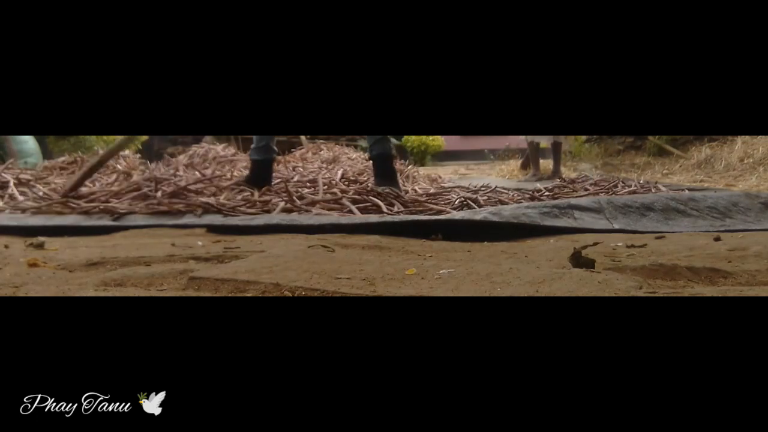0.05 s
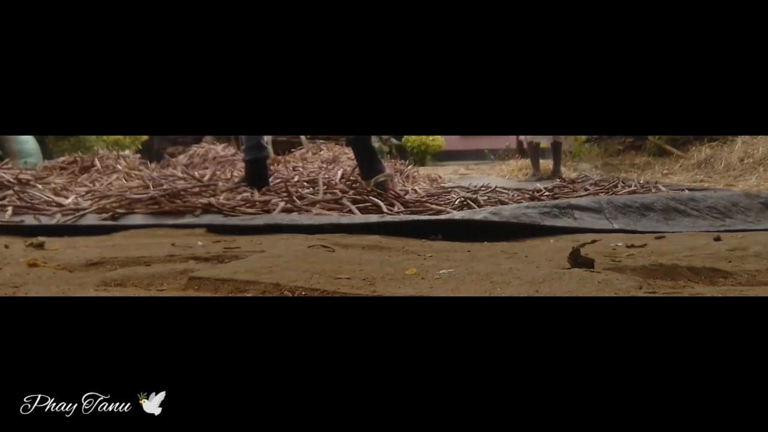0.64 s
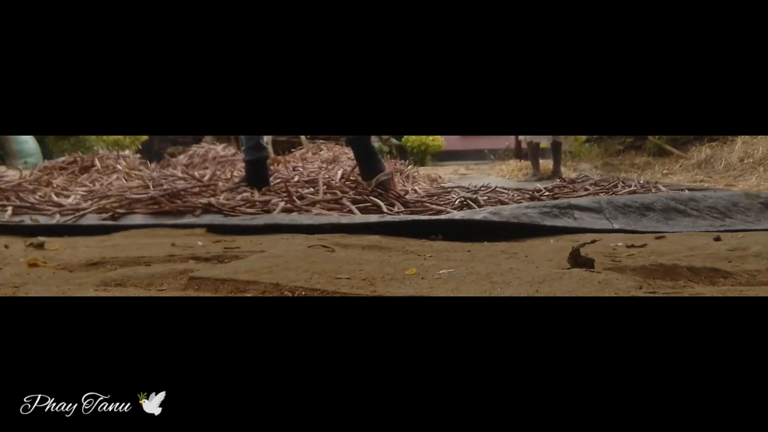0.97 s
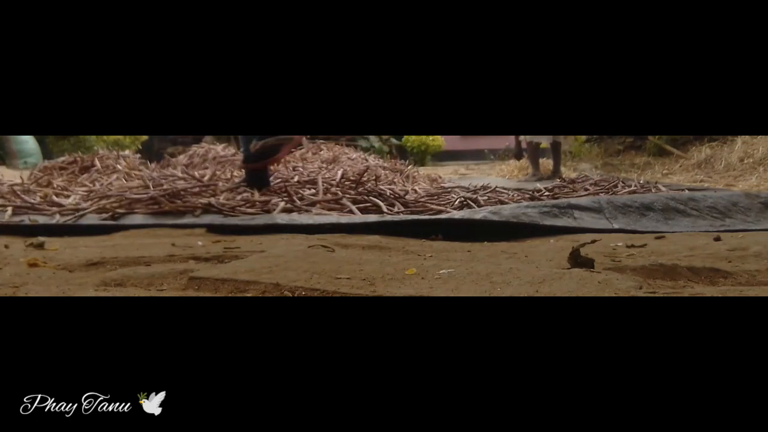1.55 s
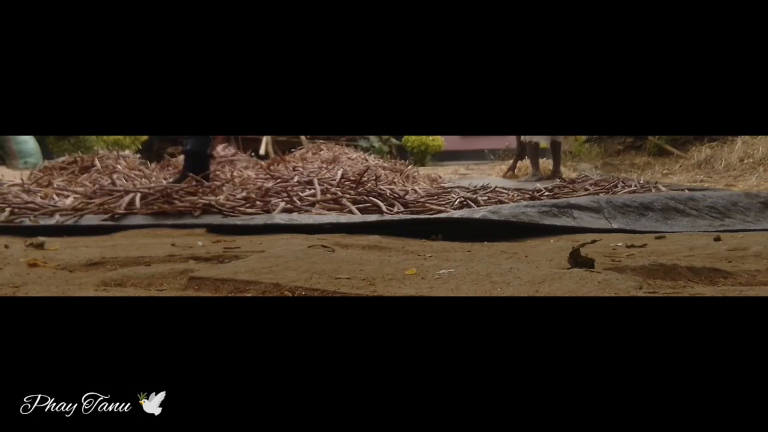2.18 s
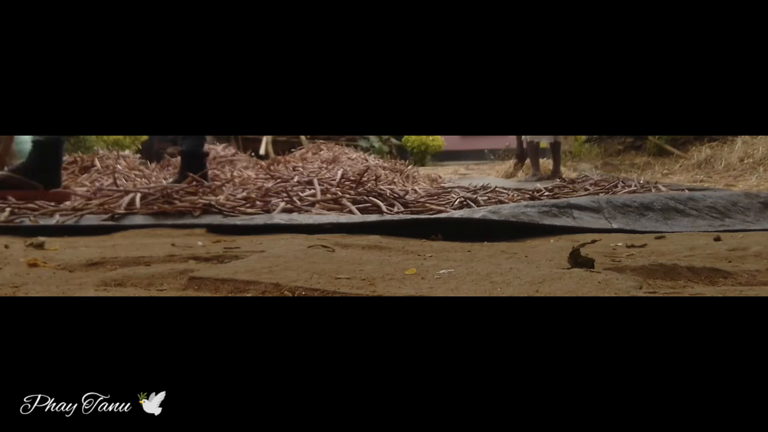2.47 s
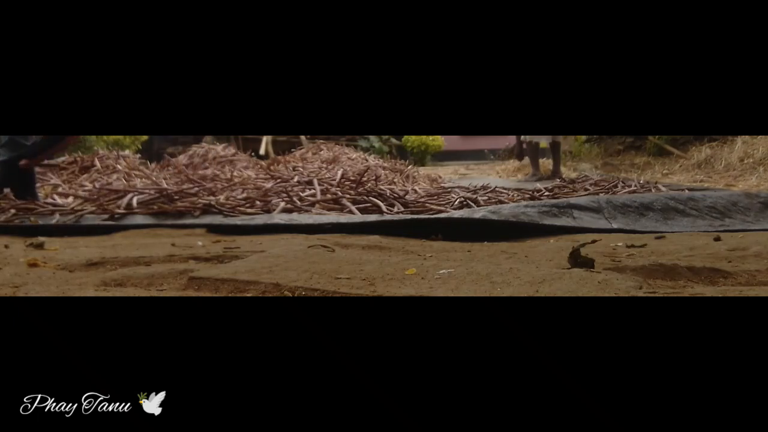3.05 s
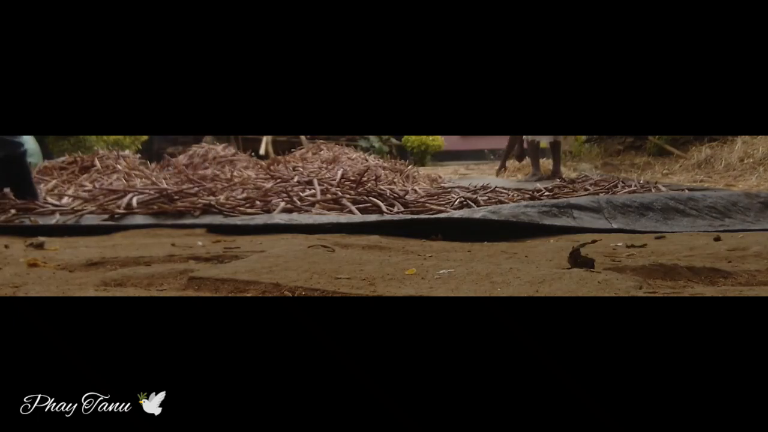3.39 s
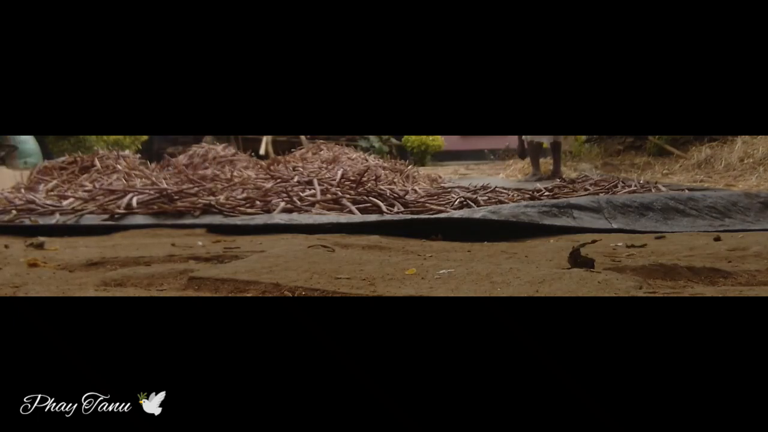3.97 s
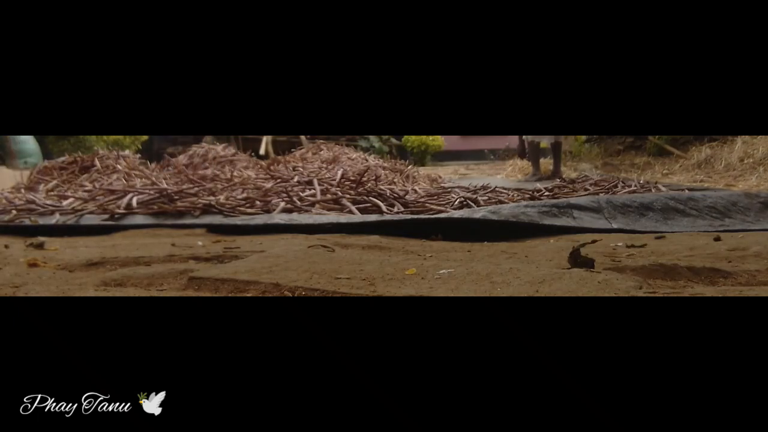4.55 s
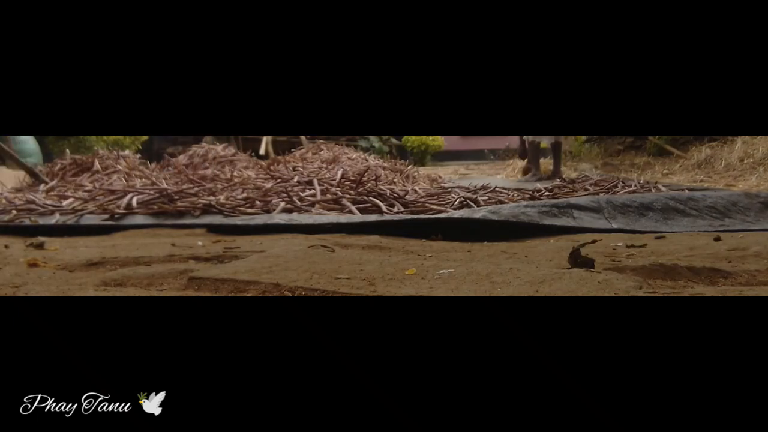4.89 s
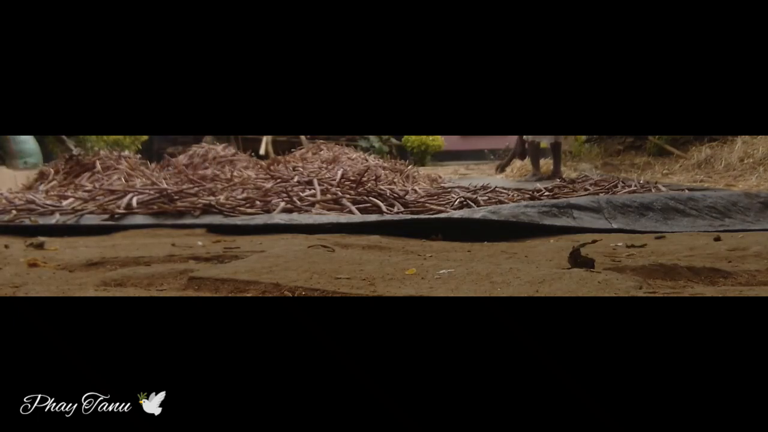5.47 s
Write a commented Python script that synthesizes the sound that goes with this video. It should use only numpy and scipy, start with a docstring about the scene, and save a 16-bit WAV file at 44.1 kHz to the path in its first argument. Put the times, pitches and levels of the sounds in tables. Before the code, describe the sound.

Dry bean pods on a tarp crackle and crunch as people tread and rake through them, heard from one spot in a still yard. Each push is a shower of tiny, crisp cracks with a low crunch, a faint rake rattle and a light husk scrape, while single pods snap out sharply.

Bursts start at once and run to about 0.6 seconds, then resume from 0.85 to 2.2, with a cluster of loud snaps around 1.8 to 2. After a short lull, a strong crunch comes from 2.6 to 3, with a pod caving in at 2.7. Softer rustling follows from 3.3 to 4, and a brief crack at 4.2. Faint ticks and rattles lead to a short burst at 4.9, a weak low crunch at 5.3 and a last push near 5.7. Each burst dulls as it fades into very faint outdoor air.

```python
"""Treading dry bean pods

People tread and rake through a heap of pods on a tarp in a quiet yard, heard at one microphone.
Each push sets off a shower of tiny fractures that ring the thin shells and the rake; a foot's
weight adds a low crunch, and single pods snap out above the rest. A steep treble cut-off, like a
noise suppressor's, opens as the crackle gets louder and closes as it fades."""
import sys
import numpy as np
from scipy import signal
from scipy.fft import rfft, irfft
from scipy.io import wavfile
from scipy.ndimage import uniform_filter1d

SR = 44100
rng = np.random.default_rng(int(sys.argv[2]) if len(sys.argv) > 2 else 0)


def put_to_file(sound):
    """Save the sound as 16-bit audio at rate SR, in the file named by the first command-line argument."""
    columns = np.atleast_2d(sound).T  # one column per channel
    safe = np.clip(columns, -1, 1)
    whole_steps = np.round(safe * 32767)
    wavfile.write(sys.argv[1], SR, whole_steps.astype(np.int16))


N = 252693
TIME = np.arange(N) / SR


def undb(db):
    """Decibels to gain."""
    return 10 ** (np.asarray(db) / 20)


def unit(x):
    """Scale to rms 1."""
    return x / np.sqrt(np.mean(x ** 2))


def response(colour, size=4096):
    """Minimum-phase impulse response of unit energy with a (Hz, dB) colour."""
    hz, db = np.transpose(colour)
    grid_hz = np.maximum(np.fft.rfftfreq(size, 1 / SR), 1)
    gain = undb(np.interp(np.log(grid_hz), np.log(hz), db))
    cepstrum = irfft(np.log(gain))
    cepstrum[1:size // 2] *= 2
    cepstrum[size // 2 + 1:] = 0
    impulse = irfft(np.exp(rfft(cepstrum)))
    return impulse / np.linalg.norm(impulse)


def ring(x, impulse):
    """Play x through an impulse response."""
    return signal.fftconvolve(x, impulse)[:len(x)]


def add(out, start_s, x):
    """Mix x into out at start_s."""
    i = int(np.clip(start_s * SR, 0, N - 1))
    out[i:i + len(x)] += x[:N - i]


def wander(rate):
    """Glide between random levels, rate a second, at rms 1."""
    step = int(SR / rate)
    levels = np.repeat(rng.standard_normal(N // step + 1), step)
    return unit(uniform_filter1d(levels, step)[:N])


# The still yard around the microphone. Each row: frequency in Hz, level in dB.
AIR_COLOUR = [(20, -23), (44, -1), (60, -15), (85, -11.5), (100, -5), (125, -12), (170, -14.5), (400, -1.5),
              (1000, -20), (2200, -24), (4400, -12.5), (6500, -22.5), (9000, -29), (15500, -24)]


def yard_air(level_db=-83):
    """Faint, even outdoor air."""
    return undb(level_db) * unit(ring(rng.standard_normal(N), response(AIR_COLOUR)))


# Foot or rake going into the heap. Each row: time of full force in seconds, hold in seconds,
# crackle level in dB, its sag while held in dB per second, rattle and crunch in relative dB.
PUSHES = [(-0.006, 0.026, -32.5, 31.5, -12.5, -19.5), (0.069, 0.031, -30.5, 21.5, -17, -21.5),
          (0.145, 0.2, -27.5, 21, -15.5, -23.5), (0.408, 0.2, -34.5, 70.5, -18.0, -22.0),
          (0.71, 0.026, -54.5, 17.5, -16.5, -28.0), (0.868, 0.078, -31, 24, -15.5, -33.5),
          (0.996, 0.13, -30.0, 2, -14, -35), (1.154, 0.29, -35.5, 22, -13.5, -23.5),
          (1.341, 0.023, -42, 23, -8.5, -20), (1.538, 0.01, -29.5, 21.0, -17.5, -39),
          (1.66, 0.084, -32, -3, -14.5, -34.5), (1.776, 0.092, -26.5, 28, -16.5, -23.5),
          (1.927, 0.22, -32, 43.5, -16, -18.5), (2.208, 0.14, -49.5, 6.0, -19.0, -31.0),
          (2.432, 0.092, -57.5, 6, -20, -18.5), (2.611, 0.14, -32, 25.5, -13.5, -35.5),
          (2.717, 0.3, -29.5, 41.5, -12.5, -22.5), (3.117, 0.16, -59.0, 1, -5.5, -21.0),
          (3.354, 0.02, -35.0, 17.5, -10.5, -27.0), (3.41, 0.19, -38, -2, -12.5, -24.5),
          (3.653, 0.34, -39.0, 13, -16.0, -38.0), (4.195, 0.19, -53, 43.5, -15.5, -24),
          (4.536, 0.11, -79, 4, -11, -16.0), (4.753, 0.064, -75, 20.0, -7.5, -12.0),
          (4.907, 0.027, -39.5, 44.5, -7, -25.0), (5.033, 0.087, -48.0, 38.5, -11.0, -26),
          (5.302, 0.21, -62.5, 15.5, -13, -9), (5.613, 0.059, -61, 1, -9.0, -14),
          (5.713, 0.05, -38.5, 19.5, -16.0, -20.5)]


def pushes(attack_s=0.087, attack_power=2.14, release_db_per_s=163):
    """Each push sinks in, sags while held and lets go; returns dB curves of crackle, rattle, crunch."""
    crackle = rattle = crunch = 1e-12
    for full_s, hold_s, db, sag, rattle_db, crunch_db in PUSHES:
        sunk = np.clip(1 - (full_s - TIME) / attack_s, 1e-6, 1)
        held_s = np.clip(TIME - full_s, 0, hold_s)
        released_s = np.maximum(TIME - full_s - hold_s, 0)
        force_db = 20 * attack_power * np.log10(sunk) - sag * held_s - release_db_per_s * released_s
        crackle += undb(db + force_db) ** 2
        rattle += undb(db + rattle_db + .88 * force_db) ** 2  # fades more slowly than the crackle
        crunch += undb(db + crunch_db + 1.2 * force_db) ** 2  # fades faster
    return 10 * np.log10([crackle, rattle, crunch])


def fractures(rate, spread_db):
    """Random clicks, rate a second, many small and a few large, of even mean power."""
    chance = np.clip(rate / SR, 1e-4, 1)
    sizes = unit(undb(spread_db * np.minimum(rng.standard_normal(N), 2.1)))
    return (rng.random(N) < chance) * rng.choice([-1, 1], N) * sizes / np.sqrt(chance)


# A thin shell cracking. Each row: frequency in Hz, level in dB.
SHELL_COLOUR = [(300, -85.5), (900, -37.5), (1900, -19.5), (2350, -10.5), (3150, -7), (3550, -7), (4200, 0),
                (4600, 1.5), (5200, -6.5), (5900, -14.5), (6800, -21.5), (7600, -43), (12000, -76.5)]


def cracking_shells(rate, size_range=0.015, count=5):
    """Shells of several sizes crack, each at its own pitch; returns their sound and the bare clicks."""
    trains = [fractures(rate / count, spread_db=3.5) / np.sqrt(count) for _ in range(count)]
    scales = 1 + size_range * np.linspace(-1, 1, count)
    shells = [response([(hz * scale, db) for hz, db in SHELL_COLOUR]) for scale in scales]
    return sum(map(ring, trains, shells)), sum(trains)


# Shells lying loose on the heap. Each row: frequency in Hz, level in dB.
LOOSE_COLOUR = [(600, -64), (2050, -26), (2380, -10), (2600, -12), (2800, -5), (2960, -11), (3170, -6.5),
                (3600, -9), (4350, -1.5), (4800, -4), (5400, -14.5), (6200, -33.5), (7500, -48.5)]


def loose_shells(taps):
    """With no weight on them, shells only tap together and ring."""
    return ring(taps, response(LOOSE_COLOUR))


# How lightly the rake sits in the heap. Each row: time in seconds, share from 0 (deep) to 1 (light).
RAKE_LIGHTNESS = [(3.07, 0.4), (3.14, 0.3), (3.31, 0.8), (3.40, 0.04), (4.5, 0.14), (4.8, 0.97),
                  (5.2, 0.98), (5.3, 0)]
# The rake's modes. Each row: frequency in Hz, width in Hz, level in dB when deep, and when light.
RAKE_MODES = [(687, 25, -22, -3.5), (828.6, 33, 4.5, -29), (1176, 80, 0.5, -16), (1269, 60, 4, -13),
              (1478, 91, 4.5, -3), (1577, 35, 4.5, 4), (1830, 56, 0.5, -19)]


def rake(knocks, size=4096):
    """Pods knock along the rake; its damped modes depend on how deep it sits in the heap."""
    t = np.arange(size) / SR
    hz, width, deep_db, light_db = np.transpose(RAKE_MODES)[:, :, None]
    modes = width * np.exp(-np.pi * width * t) * np.cos(2 * np.pi * hz * t)
    band = signal.butter(3, [560, 2300], "band", fs=SR, output="sos")
    light = np.clip(np.interp(TIME, *np.transpose(RAKE_LIGHTNESS)), 0, 1)
    out = np.zeros(N)
    for share, levels_db in (1 - light, deep_db), (light, light_db):
        impulse = signal.sosfilt(band, np.sum(undb(levels_db) * modes, axis=0))
        out += ring(knocks * np.sqrt(share), impulse / np.linalg.norm(impulse))
    return out


# The heap packed under a foot. Each row: frequency in Hz, level in dB.
PACKED_COLOUR = [(80, -73.5), (200, -40.5), (290, -16.5), (360, -9.5), (450, -6.5), (510, -2), (590, -11.5),
                 (660, -1.5), (750, -3), (850, 5), (950, -3.5), (1300, 0.5), (2100, -8.5), (3500, -16),
                 (9000, -86)]


def foot_crunch(clicks):
    """Fractures under a foot's weight sound low through the packed heap."""
    cracks = unit(0.46 * clicks + fractures(2800, spread_db=4))
    return ring(cracks, response(PACKED_COLOUR))


# Husk sliding on husk, a faint hiss at the microphone. Each row: frequency in Hz, level in dB.
SCRAPE_COLOUR = [(2500, -21), (5500, 8.5), (7500, -1), (10000, -8), (12500, -14), (15500, -17)]


def husk_scrape(clicks, rate, push_db, slip_db):
    """Husks scrape under the lightest touch, most keenly while a push is building."""
    building_db = np.clip(push_db - np.interp(TIME - .12, TIME, push_db), 0, 20)
    level_db = .5 * push_db + .22 * building_db + 2.6 * slip_db - 60
    friction = unit(.5 * clicks + fractures(rate, spread_db=-0.5))
    return ring(friction, response(SCRAPE_COLOUR)) * undb(level_db)


def treble_cutoff(hz, push_db):
    """A steep cut-off, like a noise suppressor's, opens as the crackle grows and closes as it fades."""
    edge_hz = 5300 + 1550 * undb(0.89 * np.minimum(push_db, .5))
    return 1 / np.sqrt(1 + (hz[:, None] / edge_hz) ** 50)


def shifting_contacts(x, push_db, broken):
    """The pods in contact keep changing, so resonances come and go; the treble cut-off follows."""
    frames = dict(fs=SR, nperseg=1024, noverlap=768)
    hz, times, spectrum = signal.stft(x, **frames)
    ripple = uniform_filter1d(rng.standard_normal(spectrum.shape), 3, axis=0)  # about 130 Hz wide
    ripple = uniform_filter1d(ripple, 24, axis=1)  # lasting about 0.15 s
    ripple = unit(uniform_filter1d(ripple, 12, axis=1))
    depth_db = 3 * (1 - .5 * np.interp(times, TIME, broken))  # crushed pods ring less
    peaks = undb(depth_db * ripple)
    peaks /= np.sqrt(np.mean(peaks ** 2, axis=0))
    lowpass = treble_cutoff(hz, np.interp(times, TIME, push_db))
    return signal.istft(spectrum * peaks * lowpass, **frames)[1][:N]


def heap(crackle_db, rattle_db, crunch_db):
    """The moving heap: the harder the push, the denser its crackle."""
    push_db = crackle_db + 30.5  # 0 on a full tread
    rate = 7500 * undb(.2 * push_db)  # clicks a second
    slip_db = 0.58 * wander(55)  # the heap gives way in small fits
    broken = 1 / (1 + undb(-1.5 * (crunch_db + 66.5)))  # share of shells that break under the weight
    cracking, clicks = cracking_shells(rate)
    taps = fractures(rate, spread_db=6)
    shells = np.sqrt(broken) * cracking + np.sqrt(1 - broken) * loose_shells(taps)
    crackle = shells * undb(crackle_db + slip_db + 1.07)
    knocks = unit(0.29 * taps + fractures(rate, spread_db=7.5))
    rattle = rake(knocks) * undb(rattle_db - 1)
    crunch = foot_crunch(clicks) * undb(crunch_db + 7.5)
    scrape = husk_scrape(clicks, rate, push_db, slip_db)
    return shifting_contacts(crackle + rattle + crunch, push_db, broken) + scrape


# Single pods that stand out at the microphone. Each row: start in seconds, level in dB, ring in Hz.
LOUD_SNAPS = [(0.0623, -16.5, 4130), (0.3655, -19, 4760), (0.4055, -14.5, 4230), (0.5226, -18, 4540),
              (0.6988, -37, 4310), (0.8592, -16.5, 4220), (0.9947, -14.5, 4700), (1.0414, -20.5, 4500),
              (1.1206, -15, 4220), (1.2253, -21.5, 4500), (1.6357, -21.5, 4640), (1.7943, -12, 4600),
              (1.802, -15, 4400), (1.8435, -13, 4180), (1.8645, -17, 4370), (1.9091, -17, 4450),
              (1.9299, -15, 4560), (1.9465, -14, 4260), (2.0325, -15, 4500), (2.0897, -20.5, 4410),
              (2.1438, -23, 4700), (2.2067, -26, 4500), (2.244, -26.5, 4500), (2.3193, -31, 3800),
              (2.4912, -42, 4600), (2.5206, -39, 4400), (2.7061, -11.5, 4180), (2.8453, -15.5, 4460),
              (3.0178, -24.5, 4700), (3.5417, -17.5, 4600), (3.926, -20, 4560), (3.9398, -22.5, 4140),
              (4.1852, -24, 4760), (4.3005, -36.5, 4400), (4.349, -37, 4120), (4.4253, -47, 4630),
              (4.662, -52, 3930), (4.7694, -52, 4240)]


def snaps(pods, hard_db=-13.5, knock_db=-21.5, size=2048):
    """A pod splits: one sharp crack, a brief ring of its shell and a knock into the heap."""
    out, t = np.zeros(N), np.arange(size) / SR
    husk, body, edge = map(response, (SHELL_COLOUR, PACKED_COLOUR, SCRAPE_COLOUR))
    for start_s, db, hz in pods:
        softer_db = max(hard_db - db, 0)
        top_hz = 5220 + 500 * undb(-softer_db)  # a soft snap gives little above its ring
        shell = signal.sosfilt(signal.butter(8, top_hz, fs=SR, output="sos"), husk)
        tear = .06 * rng.standard_normal(size) * np.exp(-t / .003)  # the seam tears on
        tear[0] = 1  # the first crack
        t60 = min(.0065 + .1 * softer_db, .014)  # a soft snap leaves the shell whole to ring longer
        onset = (1 - np.exp(-t / 0.00027)) ** 2
        tone = np.sin(2 * np.pi * hz * t) * undb(-60 * t / t60) * onset
        edge_db = -45.5 - 0.38 * db  # small pods tick more thinly
        snap = ring(tear, shell + undb(knock_db) * body + undb(edge_db) * edge) + 0.4 * tone
        add(out, start_s + .0005, undb(db + .5) * snap / np.abs(snap).max())
    return out


def stray_snaps(crackle_db, per_second=4, count=64):
    """Lesser pods snap at random, louder the harder the heap is being pushed."""
    starts = np.cumsum(rng.exponential(1 / per_second, count))
    level_scatter, pitch_scatter = rng.standard_normal((count, 2)).T
    levels_db = np.interp(starts, TIME, crackle_db) + 11 + level_scatter
    pods = np.column_stack([starts, levels_db, 4420 + 230 * pitch_scatter])
    return snaps(pods[starts < TIME[-1]])


# Whole pods crushed in the heap. Each row: start in seconds, peak in dB, length in seconds,
# knock into the heap in relative dB.
CRUSHED_PODS = [(0.405, -25, 0.012, -2), (1.536, -27, 0.032, -12.5), (1.965, -26.5, 0.015, 7),
                (2.705, -19.5, .014, -3), (3.017, -29.5, 0.0076, -4.5), (3.189, -40, 0.022, -19),
                (4.182, -30, 0.039, -16), (4.348, -42, 0.028, -16), (4.524, -57, 0.012, -11),
                (4.625, -53, 0.026, -11.5)]


def crushes(cracks_per_s=2500, size=4096):
    """A whole pod caves in: a short run of cracks with a low knock in it."""
    out, t = np.zeros(N), np.arange(size) / SR
    shell, body, edge = map(response, (SHELL_COLOUR, PACKED_COLOUR, SCRAPE_COLOUR))
    for start_s, db, length_s, knock_db in CRUSHED_PODS:
        cracks = rng.standard_normal(size) * (rng.random(size) < cracks_per_s / SR)
        cracks *= np.exp(-(t / length_s) ** 4)
        edge_db = -34.5 - 0.92 * knock_db  # a pod buried in the heap loses its edge
        crush = ring(cracks, shell + undb(knock_db) * body + undb(edge_db) * edge)
        add(out, start_s, undb(db) * crush / np.abs(crush).max())
    return out


def scene():
    """Everything in the open air, heard in mono from one spot in the yard."""
    crackle_db, rattle_db, crunch_db = pushes()
    pods = heap(crackle_db, rattle_db, crunch_db) + snaps(LOUD_SNAPS) + crushes()
    return (pods + yard_air() + stray_snaps(crackle_db))[None]


def record(dry, top_hz=15500):
    """The recorder cuts the top steeply."""
    return signal.sosfilt(signal.ellip(10, .2, 70, top_hz, fs=SR, output="sos"), dry)


dry = scene()
out = record(dry)
put_to_file(out)
```